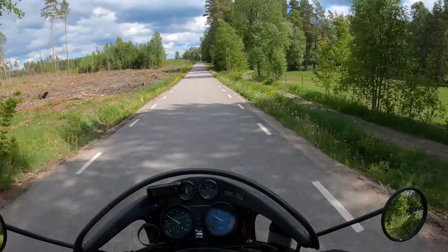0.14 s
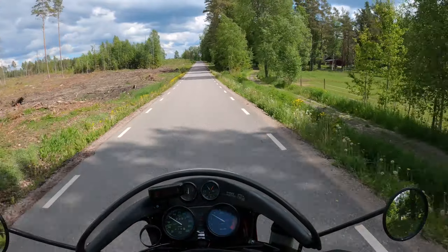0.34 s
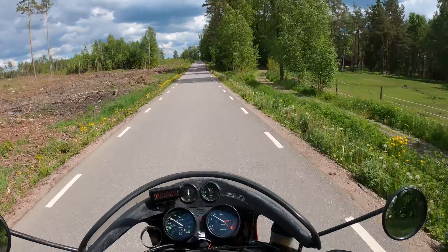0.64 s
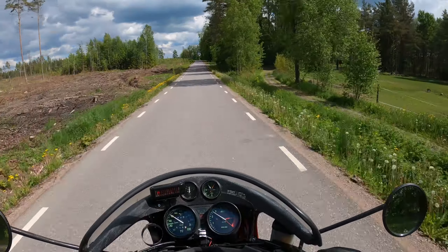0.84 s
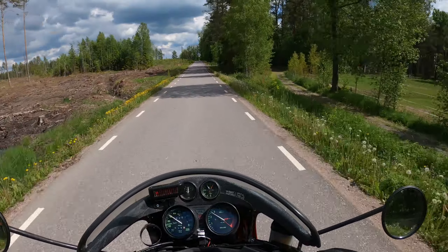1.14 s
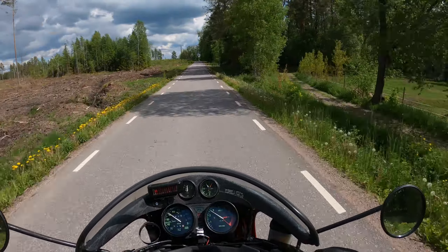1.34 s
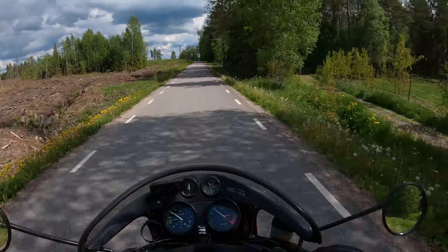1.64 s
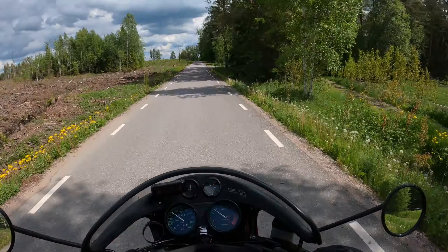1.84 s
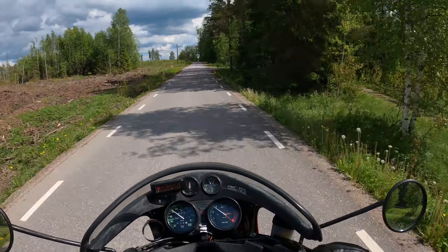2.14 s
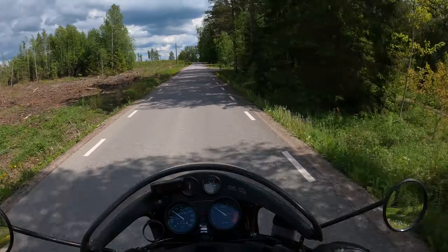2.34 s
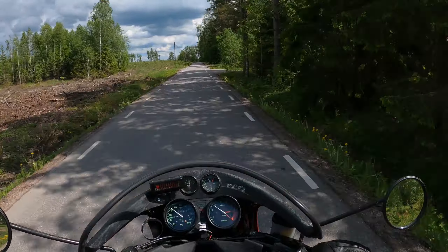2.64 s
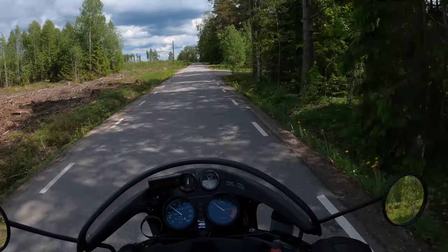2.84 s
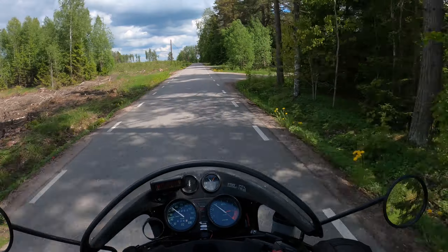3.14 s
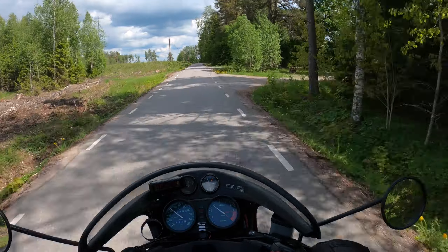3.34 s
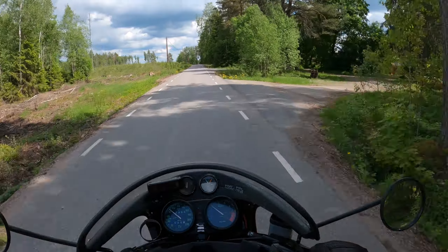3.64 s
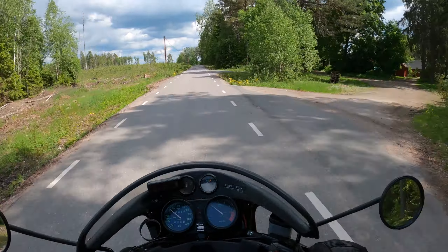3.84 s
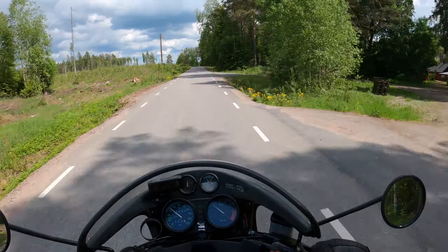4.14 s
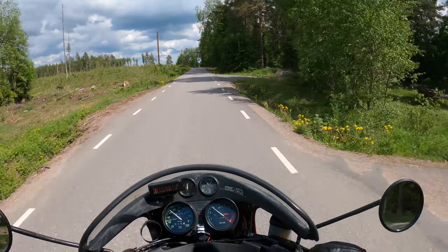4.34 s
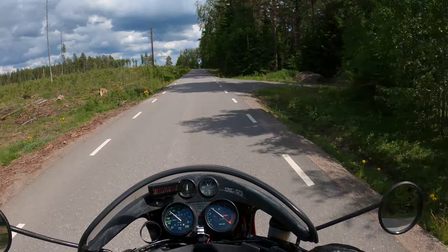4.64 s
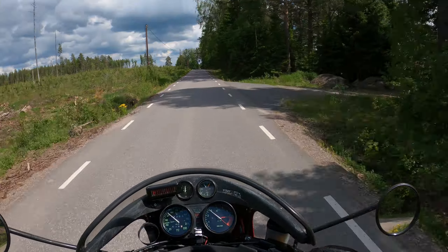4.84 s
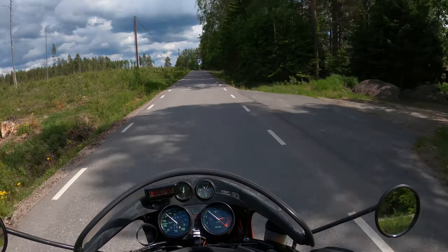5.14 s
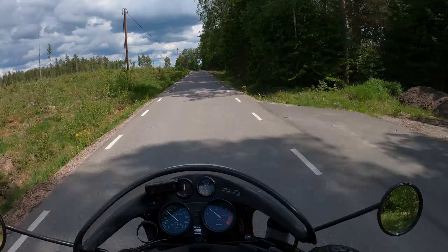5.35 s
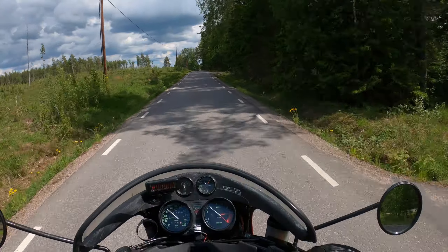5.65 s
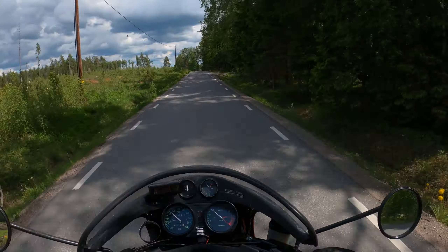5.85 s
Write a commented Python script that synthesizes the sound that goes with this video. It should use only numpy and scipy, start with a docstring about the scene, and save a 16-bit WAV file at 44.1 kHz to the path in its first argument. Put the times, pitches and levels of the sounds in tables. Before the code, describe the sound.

An onboard motorcycle ride on an open country road, heard close at the rider's seat. Throughout, a dense low exhaust drone near 90 hertz hums with a slight throb, under rapid, regular metallic clatter of pistons, valves and a loose tappet. Low wind buffeting and a soft hiss of air and tyres surround it. From about 0.4 seconds the pitch creeps gently upward, then levels off; ticking sharpens from about 0.8. From 1.3 to 2.1 seconds short dull jolts knock and rattle the fairing, strongest near 2.0, while gusts ruffle the wind until about 2.8, with a low boom near 2.5 and slight sags in the drone. Another bump lands at 3.2, a tiny bright stone tick at 3.4, and a low boom at 3.8. The engine sounds slightly fuller around 3.9. Near 5.4 the drone dips for a moment, recovers, and cruising continues to the cut at 6.

```python
"""A flat-twin motorcycle cruises along a country road, heard from the rider's seat for six seconds.
From the start the exhaust drones on crankshaft orders, metal blows ring the engine in a pattern repeated every
two turns, and shaped noise gives the wind; the crank speed soon begins to rise a little.
From about 1.3 s to 2.8 s jolts knock the fairing, gusts swell the wind, and crank speed and drone dip briefly.
A last jolt, a stone chip and a low boom follow between 3.2 s and 3.8 s; the drone sinks again near the end."""
import sys
import numpy as np
from scipy import signal
from scipy.fft import rfft, irfft, next_fast_len
from scipy.io import wavfile
from scipy.ndimage import uniform_filter1d, map_coordinates

SR = 44100
rng = np.random.default_rng(int(sys.argv[2]) if len(sys.argv) > 2 else 0)


def waveform_to_disk(signal):
    """Save audio, clipped to [-1, 1], as 16-bit WAV at the path in sys.argv[1]."""
    frames = np.transpose(np.atleast_2d(signal))
    scaled = np.clip(frames, -1, 1) * 32767
    samples = np.round(scaled).astype(np.int16)
    wavfile.write(sys.argv[1], SR, samples)


N = 265041

# Levels apply ahead of the limiting in record(); a place is a fraction of the two-turn engine cycle.
# Crank speed: initial and final values (turns per second), onset and time constant of the rise
START_HZ, CRUISE_HZ, PULL_FROM_S, SETTLE_S = 43.65, 47.32, 0.4, 1.75
# Brief loss of crank speed: time_s, loss_hz, fall_s, recovery_s
SPEED_DIP = (2.15, .155, .25, .8)
# Engine load: time_s, load_db
ENGINE_LOAD = [(0, -1.5), (.6, -1.5), (.8, -1), (2.3, -1.8), (3.4, -1), (3.9, 1.1), (5, 0.15), (6, -0.2)]

# Exhaust drone: crank_order, relative_level_db at cruise, slope_db_per_hz of crank speed
DRONE_ORDERS = [(1, -11.5, 7), (2, -0.66, -0.2), (3, -7.5, -1.1), (4, -22.5, -1.5)]
# Pipe and intake notes: crank_order, level_db at cruise before load, slope_db_per_hz of crank speed
PIPE_ORDERS = [(5, -51, -1), (6, -54, 6), (7, -53, 1.5), (7.5, -53.5, 2.5), (8, -46, 2.5),
               (9.5, -48.5, 1.5), (10.5, -48, 1), (11, -55.5, -1), (12, -51, 1.5), (14, -57.5, 0),
               (15.5, -63, -3), (16.5, -61.5, -2.5), (20, -59, -1)]
# Brief sinking of the drone: time_s, depth_db, fall_s, recovery_s
DRONE_SAGS = [(1.9, -3, 0.12, .2), (2.55, -3.5, 0.25, 0.11), (5.38, -8, 0.081, 0.059)]
DRONE_DB = -26.5  # reference level for the drone orders

# Piston thrusts: place, relative_level_db
PISTON_THRUSTS = [(0.099, 1), (.4, -1), (.59, -0.5), (.72, -2.5), (.88, 0)]
# Piston knocks on the barrels: place, relative_level_db
PISTON_KNOCKS = [(0.044, -9), (.135, -1.5), (.37, -1.5), (.415, -8.5), (.575, -10), (.615, 0), (.90, -0.5),
                 (.925, -10)]
# Valve gear blows on the heads: place, relative_level_db
VALVE_BLOWS = [(.095, -4), (.15, -5.5), (.37, -2), (0.424, -15), (.77, -9.5), (0.823, -10.5), (.89, -2),
               (.965, -0.5)]
# Loose tappet striking and rebounding, then fainter tight ones: place, relative_level_db
TAPPET_BLOWS = [(.603, 8), (.65, 1.5), (.15, -2), (.46, -6), (.77, -5), (.9, -4)]
# Valves slapping shut: place, relative_level_db
VALVE_CLOSINGS = [(.612, 0), (.665, -6), (.125, -4.5), (.39, -8), (.77, -5)]
# Strength of the loose tappet: time_s, strength_db
TAPPET_LASH = [(0, -7), (.66, -8), (.76, 0.5), (1.2, 0.5), (1.66, -0.5), (1.8, -6), (2.27, -6), (2.35, 1),
               (2.48, -2.5), (3.7, -4), (4.4, -2.5), (5, -1), (6, -0.5)]
SLAP_DB = -56.3  # closing slap before the lash

# Resonances of the crankcase: frequency_hz, width_hz, relative_level_db
CRANKCASE_MODES = [(567, 76, 1), (750, 186, 0.5), (953, 130, -1.5), (1230, 320, -8)]
# Resonances of the cylinder barrels: frequency_hz, width_hz, relative_level_db
BARREL_MODES = [(1673, 63, -0.5), (1974, 27, 7), (2127, 23, 8.5), (2214, 41, 5), (2350, 20, 0.5),
                (2674, 134, -3), (2857, 45, -2.5), (2942, 71, -2), (3030, 27, -3), (3310, 100, -3.5)]
# Resonances of the finned heads: frequency_hz, width_hz, relative_level_db
HEAD_MODES = [(3777, 55, 7), (3900, 28, 4), (4020, 130, 4), (4264, 26, 4), (4340, 30, 2), (4800, 83, -0.5),
              (4870, 72, 3), (5050, 115, 1), (5655, 76, 0), (6600, 79, -12)]
# Resonances of valve and seat: frequency_hz, width_hz, relative_level_db
SEAT_MODES = [(3770, 70, -1), (4260, 40, 2.5), (4720, 44, 6.5), (4835, 48, 3), (5020, 90, -1),
              (5680, 55, 3), (6510, 68, -6)]
# Resonances of the rocker arm: frequency_hz, width_hz, relative_level_db
ROCKER_MODES = [(7130, 200, 1), (7500, 130, 1), (8630, 130, 6.5), (9010, 90, 6), (9710, 110, 2),
                (10000, 200, 0.5), (10400, 130, -3.5), (10890, 110, -1), (12000, 1300, -20),
                (13130, 150, -15)]

# Spectrum of buffeting at the microphone: frequency_hz, relative_density_db
BUFFET_SPECTRUM = [(4, -20.5), (15, -4), (27, -5.5), (48, -0.5), (75, -1), (105, -13.5), (200, -42),
                   (700, -120)]
# Spectrum of the air pocket behind the screen: frequency_hz, relative_density_db
BOOM_SPECTRUM = [(20, -120), (60, -21.5), (95, -4), (120, -6), (142, -4.5), (165, -18), (260, -37.5),
                 (800, -120)]
# Spectrum of tumbling air: frequency_hz, relative_density_db
TUMBLE_SPECTRUM = [(30, -120), (80, -24.5), (160, 1), (250, 0), (350, -2.5), (480, -4.5), (600, -13),
                   (800, -18), (1200, -30), (2500, -56), (8000, -120)]
# Spectrum of air torn off the screen edge: frequency_hz, relative_density_db
TEAR_SPECTRUM = [(120, -20), (205, 6), (300, 2), (480, 0), (600, -6), (750, -13), (1050, -15), (1500, -24),
                 (3000, -55), (8000, -120)]
# Spectrum of the hiss of air and tyres: frequency_hz, relative_density_db
HISS_SPECTRUM = [(100, -120), (300, -25), (700, -1), (950, -3), (1300, -4), (1800, -8), (2700, -8.5),
                 (3500, -14.5), (5000, -18.5), (6900, -23.5), (8100, -31.5), (8700, -30.5), (10000, -36),
                 (11500, -43), (15000, -57.5)]
# Gusts: peak_s, strength_db, rise_s, fall_s
WIND_GUSTS = [(1.46, 2.3, .05, .12), (1.765, 5.5, .05, .035), (1.85, 6.3, .035, .075), (2.0, 3.6, .06, .08),
              (2.24, 1.5, .08, .05), (2.49, 3.4, .08, .1), (2.8, 1.8, .25, .4)]
# Level in calm air at cruising speed, and growth with crank speed or load
BUFFET_DB, BOOM_DB, TEAR_DB = -28, -32.5, -45.5
TUMBLE_DB, TUMBLE_DB_PER_HZ = -34, 0.9
HISS_DB, HISS_DB_PER_HZ, HISS_DB_PER_LOAD_DB = -42.5, 0.04, 0.75
# Decibels of rise per decibel of gust
GUST_ON_BUFFET, GUST_ON_BOOM, GUST_ON_TEAR = 0.35, 0.45, 2.1
HISS_DUCKING = 0.22  # decibels the hiss is ducked per decibel of gust, like a gain control

# Single eddies behind the screen: peak_s, rms_at_peak_db
SINGLE_EDDIES = [(.6, -29), (1.06, -21), (1.86, -24.5), (2.25, -23), (2.499, -19), (3.76, -19.5)]
POCKET_HZ, EDDY_S = 123, 0.025  # pocket note; time from an eddy's peak to 1/e

# Jolts from the road: time_s, relative_force_db, upper_edge_hz
ROAD_JOLTS = [(1.324, -26, 330), (1.423, -20, 360), (1.762, -23, 500), (1.832, -19, 560), (1.859, -22, 420),
              (1.908, -20, 720), (2.027, -16.5, 680), (2.06, -17.5, 680), (3.242, -17.5, 540)]
# Resonances of the fairing: frequency_hz, width_hz, relative_level_db
FAIRING_MODES = [(220, 150, 1), (380, 170, 0), (520, 110, 1), (630, 140, -3)]
PUSH_S, PUSH_DB = .00025, 6  # time from peak to 1/e; level relative to the jolt
RATTLE_DB, RATTLE_T60_S = -14, .05  # level relative to the jolt; time to fall 60 dB

# Spectrum of the stone chip: frequency_hz, relative_density_db
CHIP_SPECTRUM = [(1500, -30), (4000, -2), (6000, -6), (11000, -18), (14000, -35)]
CHIP_S, CHIP_DB, CHIP_T60_S = 3.433, -48.5, .04  # onset, initial rms level, time to fall 60 dB

TOP_HZ = 15700  # band limit of the output


def crank_speed():
    """Exponential approach: turns per second settle towards cruise, with one smooth loss subtracted."""
    pulling_s = np.maximum(np.arange(N) / SR - PULL_FROM_S, 0)
    at, loss_hz, down, back = SPEED_DIP
    rising = CRUISE_HZ + (START_HZ - CRUISE_HZ) * np.exp(-pulling_s / SETTLE_S)
    return rising - loss_hz * swell(at, down, back)


def exhaust(turns, speed, load_db):
    """Harmonic synthesis: crank orders change level with speed; the fainter pipe notes follow the load."""
    def at_speed(table):
        return [(order, db + slope * (speed - CRUISE_HZ)) for order, db, slope in table]

    drone_db = DRONE_DB + sum(db * swell(s, down, back) for s, db, down, back in DRONE_SAGS)
    drone = orders(turns, at_speed(DRONE_ORDERS), flutter_db=0.1, drift=0.067)
    pipe = orders(turns, at_speed(PIPE_ORDERS), flutter_db=3.0, drift=0.35)
    return amp(drone_db) * drone + amp(load_db) * pipe


def clatter(turns, speed, load_db):
    """Forced resonance: pistons, valves and a loose tappet strike metal parts at fixed places in the cycle."""
    lash_db, = curves(TAPPET_LASH)

    thrusts = blows(turns, speed, PISTON_THRUSTS, decay=0.0061, scatter_db=0.0, rough=0.54)
    thrum = ring(thrusts, CRANKCASE_MODES, low_hz=450, high_hz=1590)
    knocks = blows(turns, speed, PISTON_KNOCKS, decay=0.0028, scatter_db=0.9, rough=0.21)
    knocks = ring(knocks, BARREL_MODES, low_hz=1090, high_hz=3620)
    valves = blows(turns, speed, VALVE_BLOWS, decay=0.0032, scatter_db=0.2, rough=0.19)
    valves = ring(valves, HEAD_MODES, low_hz=3150, high_hz=7460)
    slap = ring(strikes(turns, VALVE_CLOSINGS, scatter_db=1.1), SEAT_MODES, low_hz=3400, high_hz=7500)
    tick = blows(turns, speed, TAPPET_BLOWS, decay=0.0013, scatter_db=1.7, rough=1.0)
    tick = ring(tick, ROCKER_MODES, low_hz=5500, high_hz=14500)

    pistons = amp(1.2 * load_db - 46.5) * thrum + amp(load_db - 50.5) * knocks
    running = pistons + amp(0.5 * load_db - 57.0) * valves
    return running + amp(SLAP_DB + 0.5 * lash_db) * slap + amp(lash_db - 68.5) * tick


def wind(speed, load_db):
    """Turbulence as shaped noise: gusts raise all layers but the hiss, ducked under them as by a gain control."""
    gust_db = sum(db * swell(s, rise, fall) for s, db, rise, fall in WIND_GUSTS)
    off_cruise_hz = speed - CRUISE_HZ

    buffet_db = BUFFET_DB + GUST_ON_BUFFET * gust_db + 0.52 * wobble(11.0)
    boom_db = BOOM_DB + GUST_ON_BOOM * gust_db + 0.64 * wobble(9.1)
    tumble_db = TUMBLE_DB + TUMBLE_DB_PER_HZ * off_cruise_hz + 0.96 * gust_db + 0.84 * wobble(30)
    tear_db = TEAR_DB + GUST_ON_TEAR * gust_db + 2.0 * wobble(70)
    hiss_db = HISS_DB + HISS_DB_PER_HZ * off_cruise_hz + HISS_DB_PER_LOAD_DB * load_db
    hiss_db = hiss_db - HISS_DUCKING * gust_db + 0.54 * wobble(40)

    low = amp(buffet_db) * noise(BUFFET_SPECTRUM) + amp(boom_db) * noise(BOOM_SPECTRUM)
    middle = amp(tumble_db) * noise(TUMBLE_SPECTRUM) + amp(tear_db) * noise(TEAR_SPECTRUM)
    return low + middle + amp(hiss_db) * noise(HISS_SPECTRUM)


def eddies():
    """Cavity resonance: each eddy is a brief swell of one phase-wandering note of the pocket behind the screen."""
    t = np.arange(N) / SR
    phase = 2 * np.pi * (POCKET_HZ * t + rng.random()) + 1.26 * wobble(25)
    envelope = sum(amp(db) * swell(s, EDDY_S, EDDY_S) for s, db in SINGLE_EDDIES)
    return np.sqrt(2) * np.sin(phase) * envelope


def jolts():
    """Impulse excitation: uneven asphalt gives the fairing short pushes, each with a decaying noise rattle."""
    t, out = np.arange(N) / SR, np.zeros(N)
    for s, db, edge_hz in ROAD_JOLTS:
        push = amp(PUSH_DB) * swell(s, PUSH_S, PUSH_S)
        decay = amp(RATTLE_DB - 60 * np.abs(t - s) / RATTLE_T60_S) * (t >= s)
        force = amp(db) * (push + decay * rng.standard_normal(N))
        # ring() normalizes, so the strength of the force is restored
        out += np.std(force) * ring(force, FAIRING_MODES, low_hz=142, high_hz=edge_hz)
    return out


def chip():
    """Exponential decay: a stone chip flicks the bike as one small bright burst of noise."""
    t = np.arange(N) / SR - CHIP_S
    return amp(CHIP_DB - 60 * np.abs(t) / CHIP_T60_S) * (t >= 0) * noise(CHIP_SPECTRUM)


def orders(turns, table, flutter_db, drift):
    """Order synthesis: sines on multiples of crank speed, shaken in level and phase by uneven firing and air."""
    total = 0
    for order, db in table:
        level = amp(db + flutter_db * wobble(12)) * np.sqrt(2)
        phase = 2 * np.pi * (order * turns + rng.random()) + drift * wobble(10)
        total = total + level * np.sin(phase)
    return total


def blows(turns, speed, table, decay, scatter_db, rough):
    """Cyclic excitation: decaying bursts (1/e in decay s) repeat their shape, save a rough share always new."""
    repeated, envelope = np.zeros(N), np.zeros(N)
    rough = np.clip(rough, 0, 1)
    for place, db in table:
        position = turns / 2 - place + 1  # the camshaft turns at half crank speed
        cycle = position.astype(int)
        age_s = (position - cycle) * 2 / speed
        cycle_level = amp(db + scatter_db * rng.standard_normal(size=512))
        burst = cycle_level[cycle] * np.exp(-age_s / decay)
        shape = rng.standard_normal(SR)
        repeated += burst * shape[(age_s * SR).astype(int)]
        envelope += burst
    return np.sqrt(1 - rough) * repeated + np.sqrt(rough) * envelope * rng.standard_normal(N)


def strikes(turns, table, scatter_db):
    """Impulse train: one-sample metal contacts tied to the camshaft, nearly equal from cycle to cycle."""
    out = np.zeros(N)
    for place, db in table:
        hits = np.flatnonzero(np.diff(np.floor(turns / 2 - place)))
        levels = amp(db + scatter_db * rng.standard_normal(size=512))
        out[hits] += levels[:len(hits)]
    return out


def ring(x, modes, low_hz, high_hz):
    """Modal superposition: resonances of alternating sign between two steep band edges, at rms 1."""
    def body(f):
        total = 0
        for k, (center, width, db) in enumerate(modes):
            damping = 1j * f * width
            total = total + (-1) ** k * amp(db) * damping / (center * center - f * f + damping)
        return total

    edges = signal.butter(3, [low_hz, min(high_hz, SR / 2 - 1)], "band", fs=SR, output="sos")
    return unit(signal.sosfilt(edges, filtered(x, body)))


def noise(spectrum):
    """Spectral shaping: white noise takes the given colour, interpolated over log frequency, at rms 1."""
    f, db = np.transpose(spectrum)

    def colour(hz):
        return amp(np.interp(np.log(hz + 1), np.log(f), db))

    return unit(filtered(rng.standard_normal(N), colour))


def filtered(x, response):
    """Convolution theorem: the spectrum of x is multiplied by a response of frequency."""
    m = next_fast_len(N + 8192)
    return irfft(rfft(x, m) * response(np.fft.rfftfreq(m, 1 / SR)), m)[:N]


def swell(at, rise, fall):
    """Gaussian envelope: a hump of height 1 at its peak time, with rise and fall times to 1/e."""
    t = np.arange(N) / SR - at
    return np.exp(-(t / np.where(t < 0, rise, fall)) ** 2)


def wobble(rate):
    """Spline-interpolated random process: a smooth curve with rate random knots a second."""
    steps = np.arange(0, N * rate / SR + 1, 1 / 8)
    knots = rng.standard_normal(int(steps[-1]) + 4)
    return np.interp(np.arange(N) * rate / SR, steps, map_coordinates(knots, [steps]))


def curves(rows):
    """Linear interpolation: one value per sample for each column after the time."""
    s, *cols = np.transpose(rows)
    return [np.interp(np.arange(N) / SR, s, c) for c in cols]


def amp(db):
    """Logarithmic level: decibels to amplitude gain."""
    return 10 ** (np.asarray(db) / 20)


def unit(x):
    """Power normalization: x at rms 1."""
    return x / np.sqrt(np.mean(x ** 2) + 1e-20)


def limiter(x, ceiling_db, hold):
    """Soft limiting: gain eases down as the power, smoothed twice over hold s, nears the ceiling."""
    span = max(2, int(hold * SR))
    power = np.abs(uniform_filter1d(uniform_filter1d(x ** 2, span), span))
    return x / (1 + (power / amp(ceiling_db) ** 2) ** 4) ** (1 / 8)


def scene():
    """Superposition: engine, wind and road add at the rider's seat."""
    speed = crank_speed()
    load_db, = curves(ENGINE_LOAD)
    turns = np.cumsum(speed) / SR
    engine = exhaust(turns, speed, load_db) + clatter(turns, speed, load_db)
    return (engine + wind(speed, load_db) + eddies() + jolts() + chip())[None]


def record(dry):
    """Two-stage limiting: first the bass, then the whole level is held down, and a band limit follows."""
    bass = filtered(dry[0], lambda hz: 1 / (1 + (hz / 170) ** 8))
    steadied = dry[0] - bass + limiter(bass, ceiling_db=-21.0, hold=0.027)
    held = limiter(amp(0.08) * steadied, ceiling_db=-20.0, hold=0.0087)
    return filtered(held, lambda hz: hz < TOP_HZ)[None]


dry = scene()
out = record(dry)
waveform_to_disk(out)
```